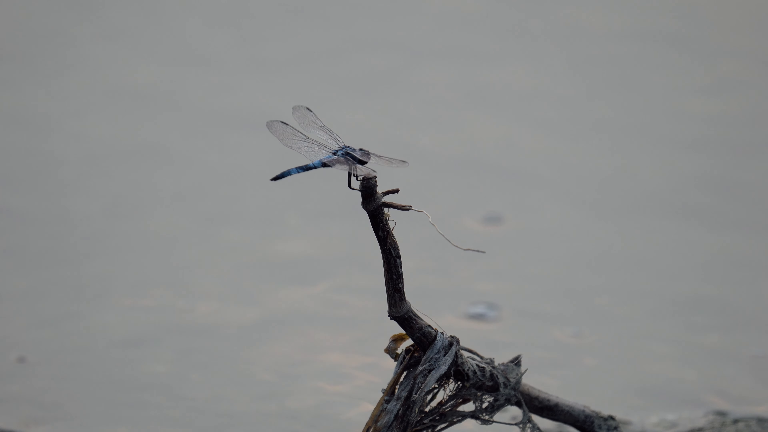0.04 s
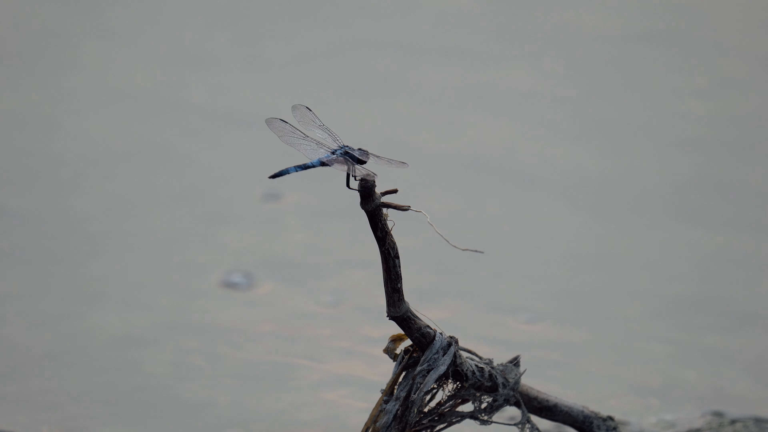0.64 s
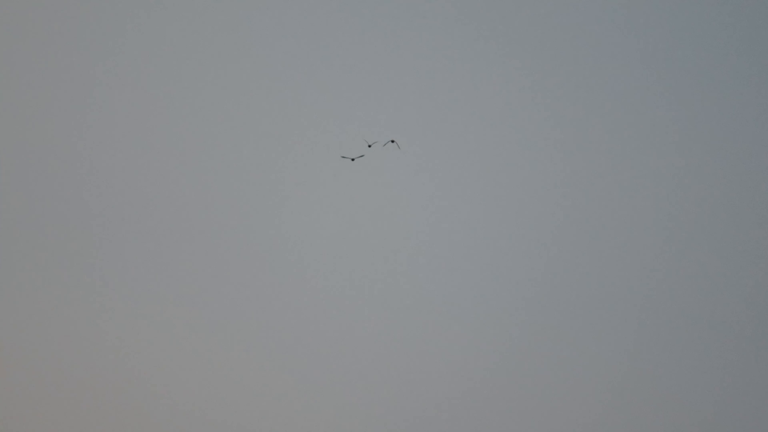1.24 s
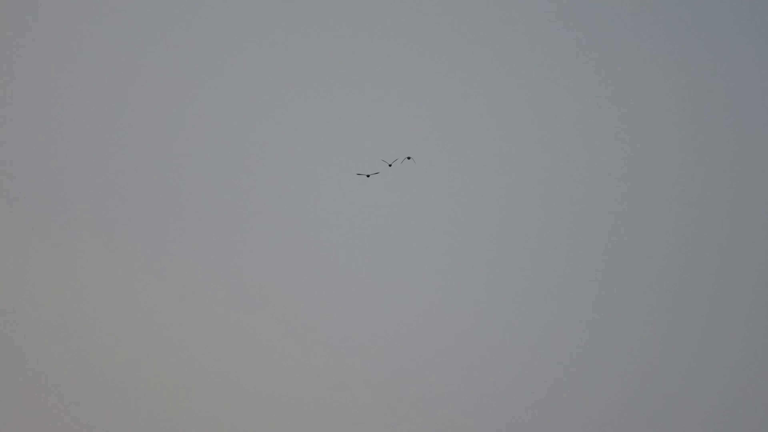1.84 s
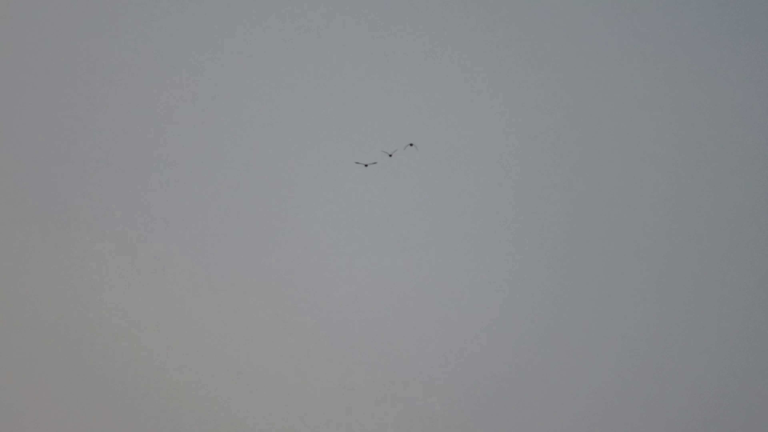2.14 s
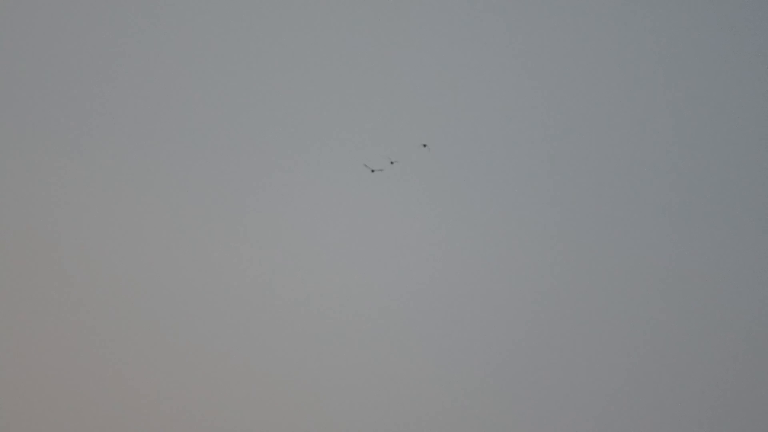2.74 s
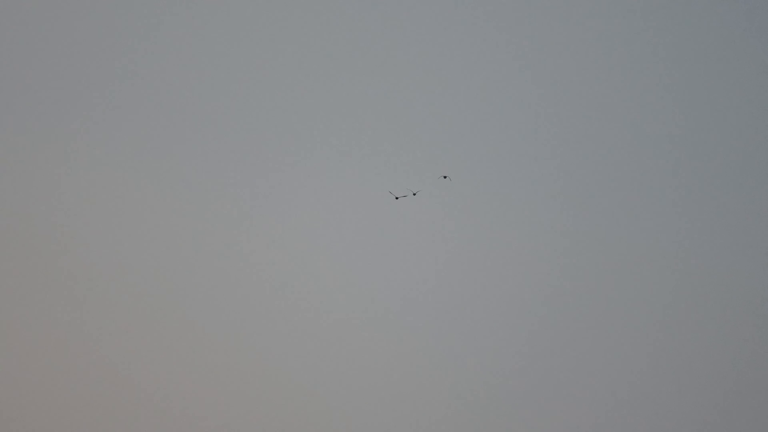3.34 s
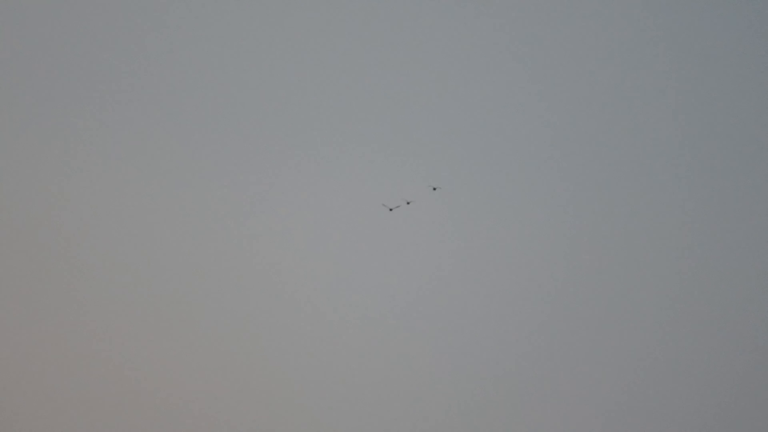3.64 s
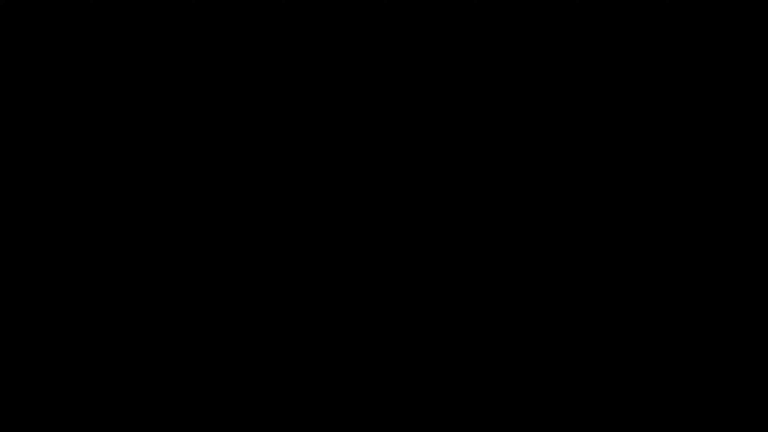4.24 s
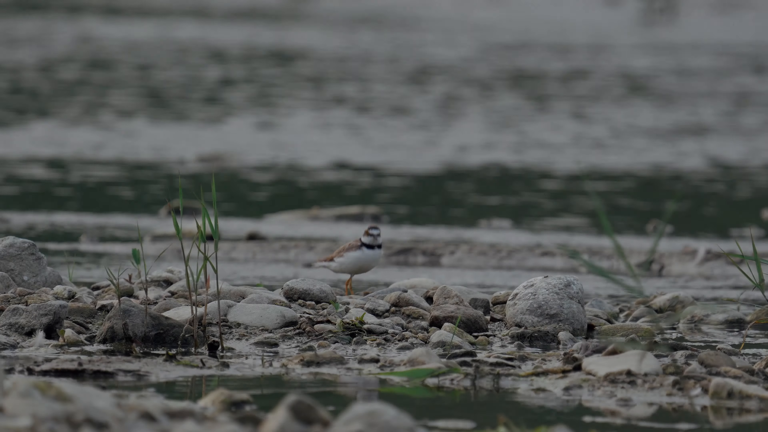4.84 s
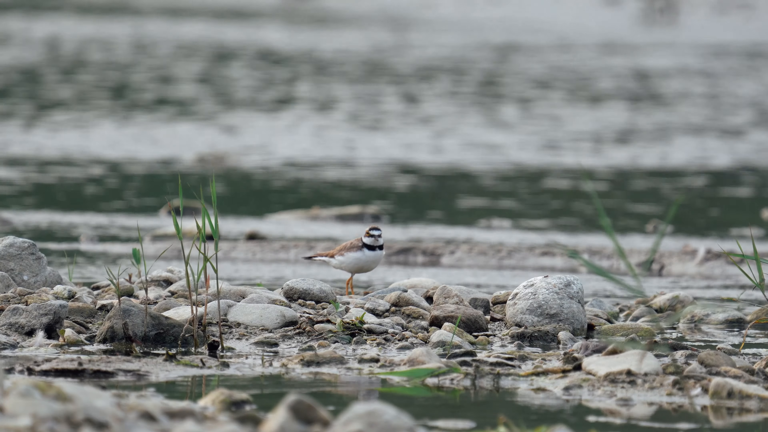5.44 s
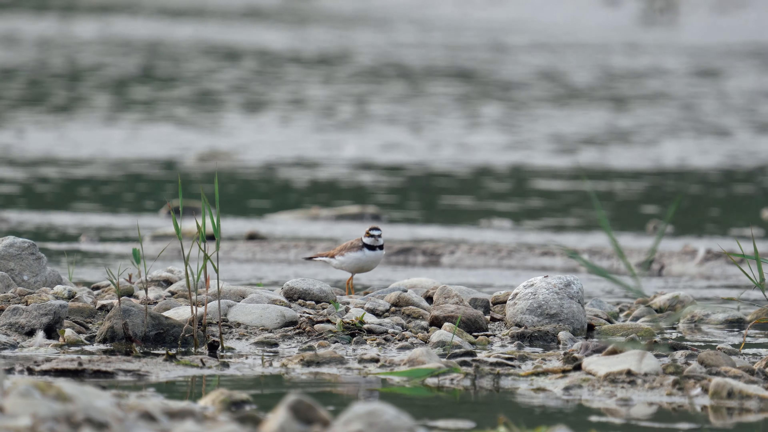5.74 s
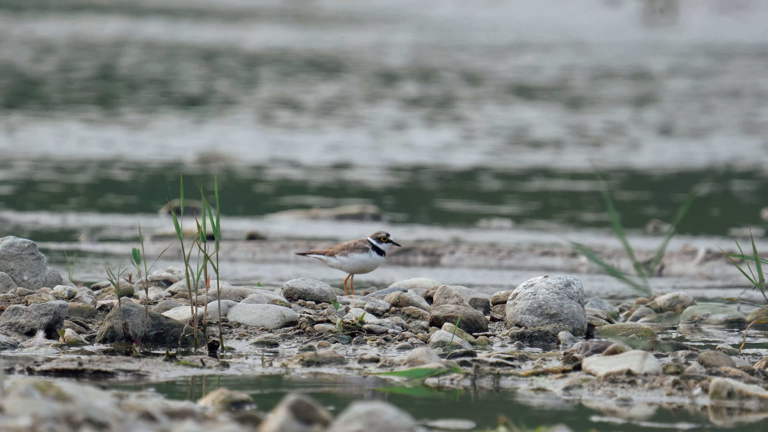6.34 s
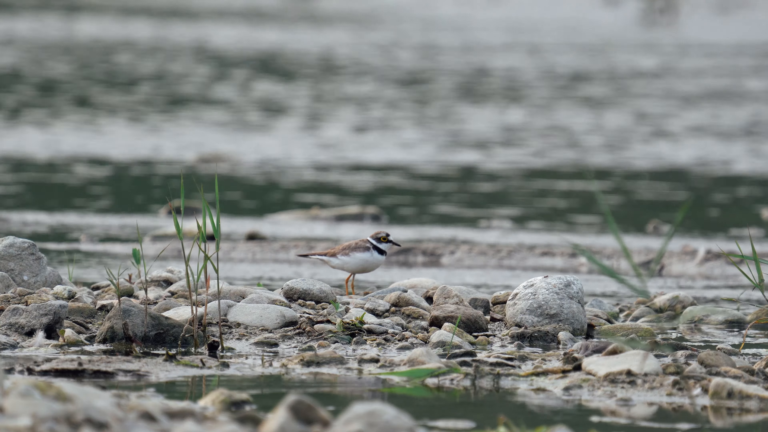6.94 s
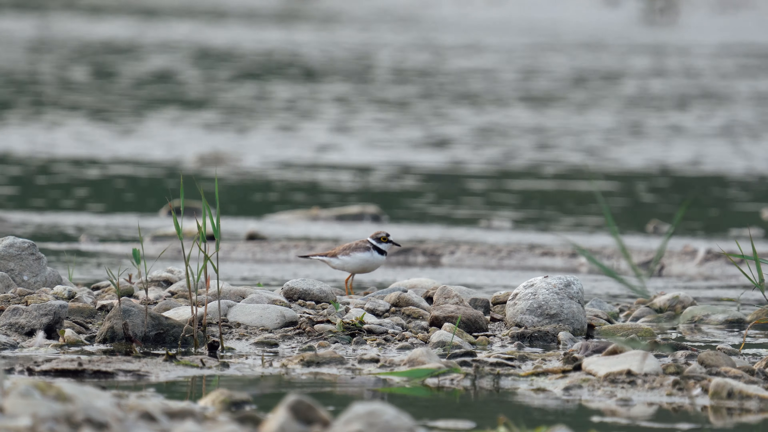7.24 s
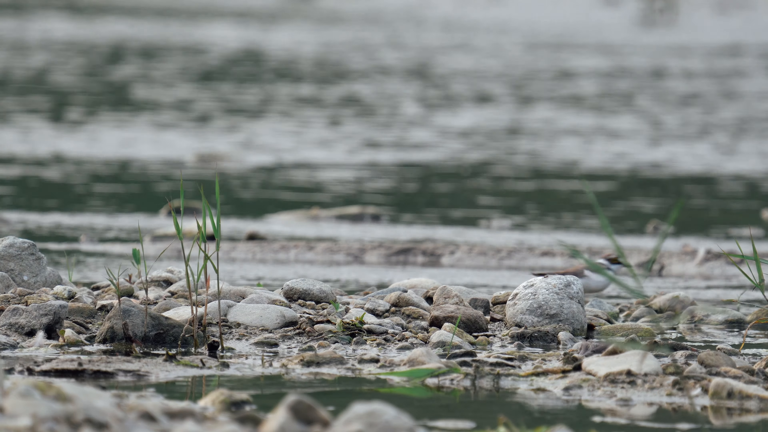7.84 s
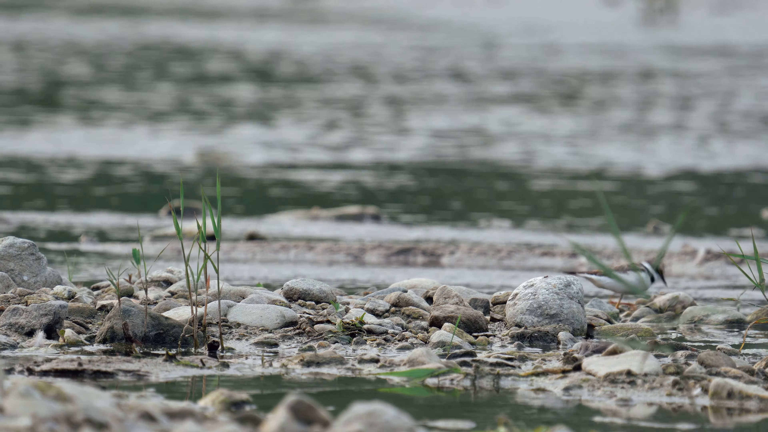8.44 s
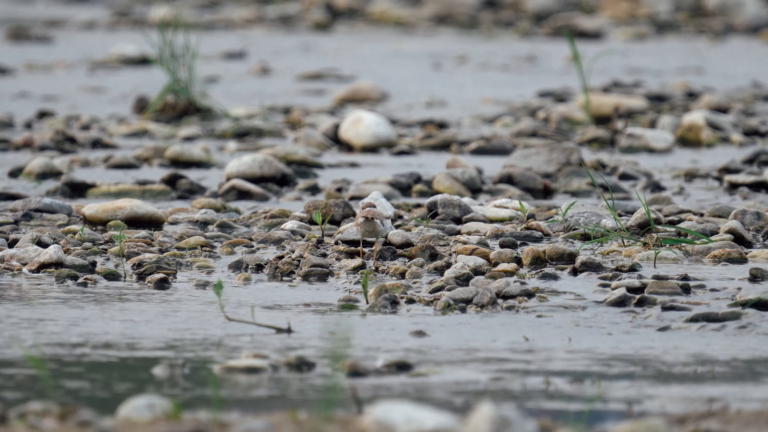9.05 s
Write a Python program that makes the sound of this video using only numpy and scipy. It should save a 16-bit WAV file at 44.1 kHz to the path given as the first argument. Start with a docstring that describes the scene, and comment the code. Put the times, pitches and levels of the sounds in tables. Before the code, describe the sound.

A river rushes steadily, blended with far traffic and heard outdoors from four spots on the bank. Breeze flutters low on the microphone while small distant birds chip and peep. About halfway the sound fades briefly to silence, then the water returns with faint thin whistles and a far motor drone. Near the end a click marks a change to a lower drone. A very faint insect buzz comes and goes.

```python
"""A river's steady rush of turbulence and ringing bubbles, merged with far traffic.
Heard from four spots on the bank, joined by two clicking hard cuts and one short fade to silence.
Breeze eddies buffet the microphone. Far off, small birds chip, peep and whistle and motors drone.
Under these: a thin insect buzz, two dry ticks and a faint electronic whine."""
import sys
import numpy as np
from scipy import signal
from scipy.fft import rfft, irfft, next_fast_len
from scipy.io import wavfile
from scipy.ndimage import uniform_filter1d

SR = 44100
rng = np.random.default_rng(int(sys.argv[2]) if len(sys.argv) > 2 else 0)


def store_pcm(level_fs):
    """Save levels as 16-bit WAV."""
    pcm = np.round(np.clip(level_fs, -1, 1) * 32767).astype(np.int16)
    wavfile.write(sys.argv[1], SR, np.atleast_2d(pcm).T)


N = 406161
T = np.arange(N) / SR

# listening spots: start_s, end_s
SPOTS = [(0, 1.077), (1.077, 4.258), (4.289, 8.5163), (8.5163, 9.3)]
# electronic tones: start_s, end_s, pitch_hz, level_db
WHINE_TONES = [(4.8, 9.2, 10000, -85), (5.0, 8.4, 8000, -87)]
# dry ticks: start_s, decay_s, centre_hz, width_hz, level_db
DRY_TICKS = [(.461, .013, 6000, 11000, -57), (9.063, .002, 7450, 4000, -49)]
# insect buzzes: start_s, length_s, centre_hz, level_db
INSECT_BUZZES = [(1.0, 1.55, 8450, -76), (1.08, 1.0, 8620, -74), (4.3, .45, 8200, -77),
                 (6.3, 1.0, 8250, -77), (8.22, .12, 8150, -75), (8.52, .72, 6900, -73)]
# far engine notes: time_s, pitch_hz, level_db
HIGH_MOTOR = [(5.3, 409, -56), (5.9, 414.5, -47), (6.5, 409.7, -44), (7.3, 411, -40), (7.8, 401.6, -48.5),
              (8.5, 390, -50.5)]
LOW_MOTOR = [(8.52, 166, -44), (8.8, 168, -37), (9.25, 169, -41.5)]
# rasping chips: start_s, top_hz, level_db, note_count
BIRD_CHIPS = [(.005, 4900, -57, 1), (.13, 5300, -61, 1), (.517, 4800, -54, 1), (1.11, 5300, -58, 1),
              (1.61, 4600, -56.5, 1), (1.79, 4300, -57, 1), (2.112, 4700, -55, 1), (2.165, 5020, -51, 2),
              (2.388, 5030, -50.5, 2), (2.77, 4300, -53, 1), (3.16, 5050, -54.5, 2), (3.4, 5050, -53.5, 2),
              (4.07, 4200, -56, 1)]
# arched peeps and thin whistles: start_s, length_s, top_hz, level_db
BIRD_PEEPS = [(2.715, .045, 4480, -56), (2.962, .04, 3720, -51), (2.988, .05, 4480, -50),
              (2.998, .036, 3600, -43)]
BIRD_WHISTLES = [(5.51, .11, 6080, -73), (6.52, .09, 5700, -70), (6.75, .13, 6450, -73),
                 (7.13, .14, 5880, -70), (7.49, .15, 6560, -67), (7.62, .15, 6330, -60),
                 (7.91, .19, 5880, -68), (7.93, .21, 6840, -67), (8.18, .06, 5530, -71),
                 (8.345, .06, 6630, -68), (8.44, .055, 5780, -69)]
# eddy spectrum: freq_hz, density_db
EDDY_SPECTRUM = [(4, -4), (9, 0.5), (18, 6.5), (30, -3), (42, -6.5), (65, -14), (100, -21), (170, -30),
                 (400, -57), (2000, -140)]
# breeze between gusts, per spot: relative_db
LULL_DB = [-39, -22.5, -33.5, -28]
# gusts: peak_s, length_s, rise_db
BREEZE_GUSTS = [(.5, 0.53, 4.5), (1.26, .2, 3.5), (2.42, 0.34, 4.5), (2.84, 0.3, 6), (3.494, 0.33, 5.5),
                (3.95, 0.59, 5.5), (4.885, 0.62, 10), (5.348, 0.31, 8), (6.98, 0.29, 7), (7.62, 0.48, 6.5),
                (8.15, 0.4, 6), (8.756, 0.63, 5.5)]
# rush spectrum before tinting: freq_hz, density_db
RUSH_SPECTRUM = [(100, 0.0), (500, -7.6), (750, -2.7), (1000, -0.1), (1300, -5.4), (1650, -9.5),
                 (2350, -20.0), (3100, -21.5), (3550, -23.8), (4200, -32.3), (5400, -37.8), (7000, -41.7),
                 (11000, -52.9), (15000, -52.6)]
# tint by ground and distance, one table per spot: freq_hz, gain_db
POOL_TINT = [(100, -6.3), (220, -7.2), (420, 1.3), (700, -0.9), (1000, -1.5), (2200, -3.6), (4500, 0.8),
             (7000, -1.7), (15000, -2.0)]
OPEN_SKY_TINT = [(100, -6.0), (190, -1.7), (320, 1.5), (550, 6.7), (800, 5.0), (1400, 2.3), (4500, 3.8),
                 (7000, 0.9), (9000, 4.4), (15000, 3.5)]
GRAVEL_TINT = [(100, -3.7), (210, 2.4), (290, 2.7), (500, -4.5), (750, -1.0), (1600, 0.8), (3300, 0.8),
               (4300, -3.1), (5600, -0.4), (7000, -2), (15000, -1.4)]
SHALLOWS_TINT = [(100, -6.7), (220, 3.0), (350, -1.9), (540, -5.9), (800, -2.3), (1900, -0.4), (3500, -1.5),
                 (4700, -3.4), (6800, -0.0), (15000, -1.2)]
# rush, per spot: level_db
RUSH_LEVEL_DB = [-33, -27.5, -31, -32.5]


def undb(db):
    """Decibels to gain."""
    return 10 ** (np.asarray(db) / 20)


def unit(x):
    """Scale to rms 1."""
    return x / np.sqrt(np.mean(x ** 2) + 1e-20)


def add(out, start_s, x):
    """Mix x into out from start_s."""
    i = max(int(start_s * SR), 0)
    out[i:i + len(x)] += x[:max(len(out) - i, 0)]


def walk(rate_hz):
    """Smooth random control, spread near 1."""
    steps = rng.standard_normal(2048)
    return 1.29 * np.interp(T * rate_hz, np.arange(len(steps)), steps)


def gate(start_s, end_s, ramp_s):
    """On-window with linear ramps."""
    return np.clip(np.minimum(T - start_s, end_s - T) / ramp_s, 0, 1)


def colour(x, spectrum):
    """Filter x by (freq_hz, gain_db) points; rms 1."""
    hz, db = np.transpose(spectrum)
    size = next_fast_len(len(x))
    bins_hz = np.maximum(np.fft.rfftfreq(size, 1 / SR), 1)
    gain = undb(np.interp(np.log(bins_hz), np.log(hz), db))
    return unit(irfft(rfft(x, size) * gain, size)[:len(x)])


def band(count, centre_hz, width_hz):
    """Noise in a bell-shaped band; rms 1."""
    size = next_fast_len(count)
    bins_hz = np.fft.rfftfreq(size, 1 / SR)
    bell = np.exp(-2 * ((bins_hz - centre_hz) / width_hz) ** 2)
    return unit(irfft(rfft(rng.standard_normal(size)) * bell, size)[:count])


def electronics(waver_db=2):
    """Thin electronic tones, unsteady in level."""
    out = np.zeros(N)
    for start_s, end_s, hz, db in WHINE_TONES:
        tone = unit(np.sin(2 * np.pi * hz * T))
        out += undb(db + waver_db * walk(30)) * tone * gate(start_s, end_s, ramp_s=.3)
    return out


def ticks():
    """Faint close ticks: fast-decaying noise."""
    out, t = np.zeros(N), T[:SR // 10]
    for start_s, decay_s, hz, width_hz, db in DRY_TICKS:
        add(out, start_s, undb(db) * band(len(t), hz, width_hz) * np.exp(-t / decay_s))
    return out


def insects(width_hz=520):
    """Bursts of buzzing, each in one narrow resonance."""
    out = np.zeros(N)
    for start_s, length_s, hz, db in INSECT_BUZZES:
        count = int(length_s * SR)
        add(out, start_s, undb(db) * band(count, hz, width_hz) * signal.windows.tukey(count, .25))
    return out


def motor(track, blur_hz, direct_gain=.45):
    """Far engine note: direct sound, blurred by many paths over the ground."""
    time_s, hz, db = np.transpose(track)
    phase = 2 * np.pi * np.cumsum(np.interp(T, time_s, hz)) / SR
    paths = direct_gain + walk(blur_hz) + 1j * walk(blur_hz)
    note = unit(np.real(paths * np.exp(1j * phase)))
    return note * undb(np.interp(T, time_s, db)) * gate(time_s[0], time_s[-1], ramp_s=.018)


def syllable(path_hz, db):
    """Near-pure bird tone along a pitch path, soft at both ends."""
    envelope = np.abs(np.sin(np.linspace(0, np.pi, len(path_hz)))) ** .18
    return undb(db) * unit(envelope * np.sin(2 * np.pi * np.cumsum(path_hz) / SR))


def chips(rasp_hz=190, rasp_depth=.06, droop=.46, crest=.248, spacing_s=.072, accent_db=2):
    """Pitch crests early, then falls, with a fast rasp; the second of a pair is louder."""
    out = np.zeros(N)
    for start_s, top_hz, db, note_count in BIRD_CHIPS:
        length_s = .024 * (5030 / top_hz) ** 4  # lower chips last longer
        t = T[:int(length_s * SR)]
        arch_hz = top_hz * (1 - droop * (t / length_s - crest) ** 2)
        rasp = 1 + rasp_depth * np.sin(2 * np.pi * rasp_hz * t)
        for k in range(note_count):
            add(out, start_s + k * spacing_s, syllable(arch_hz * rasp, db + k * accent_db))
    return out


def peeps(bend_hz_per_s2=980000, waver=.0092):
    """One slightly rough arch of pitch per peep."""
    out, wobble = np.zeros(N), 1 + waver * walk(190)
    for start_s, length_s, top_hz, db in BIRD_PEEPS:
        t = T[:int(length_s * SR)]
        path_hz = top_hz - bend_hz_per_s2 * (t - length_s / 2) ** 2
        add(out, start_s, syllable(path_hz * wobble[int(start_s * SR):][:len(t)], db))
    return out


def whistles(rise_s=.04, glide_hz_per_s=3100, waver=.0057, flutter_db=1.3):
    """Whistles climb briefly and sink; pitch wavers, level flutters."""
    out, wobble = np.zeros(N), 1 + waver * walk(68)
    for start_s, length_s, top_hz, db in BIRD_WHISTLES:
        t = T[:int(length_s * SR)]
        path_hz = top_hz - glide_hz_per_s * np.abs(t - rise_s)
        add(out, start_s, syllable(path_hz * wobble[int(start_s * SR):][:len(t)], db))
    return out * undb(flutter_db * walk(60))


def birds(echo_db=-7, echo_decay_s=.0077):
    """Far calls, scattered by the bank."""
    calls = chips() + peeps() + whistles()
    t = T[:SR // 3]
    scatter = rng.standard_normal(len(t)) * np.exp(-t / echo_decay_s)
    echo = signal.fftconvolve(calls, scatter / np.linalg.norm(scatter))[:N]
    return calls + undb(echo_db) * echo


def breeze(gain_db=2.5, evenness=.98):
    """Eddies push on the microphone: a deep flutter that follows the gusts."""
    eddies = colour(rng.standard_normal(N), EDDY_SPECTRUM)
    power = uniform_filter1d(uniform_filter1d(eddies ** 2, SR // 6), SR // 20)
    flutter = unit(eddies / np.sqrt(power + 1e-9) ** evenness)  # chance swells levelled out
    steps_db = np.select([T < end_s for _, end_s in SPOTS], np.array(LULL_DB, float))
    lull_db = uniform_filter1d(steps_db, SR // 100)
    gust_db = sum(rise_db * .5 ** ((2 * (T - peak_s) / length_s) ** 2)
                  for peak_s, length_s, rise_db in BREEZE_GUSTS)
    return flutter * undb(lull_db + gust_db + gain_db)


def turbulence(flicker_db=.67, flicker_hz=14, surge_db=.14, surge_hz=5.9):
    """Broad noise: each half octave flickers alone; all surge slightly together."""
    size = next_fast_len(N)
    white = rfft(rng.standard_normal(size))
    bins_hz = np.fft.rfftfreq(size, 1 / SR)
    half_octaves = 2 * np.log2(np.clip(bins_hz / 125, 1, 128))
    out = np.zeros(N)
    for k in range(15):
        share = np.cos(np.pi / 2 * np.clip(half_octaves - k, -1, 1)) ** 2
        out += irfft(white * share, size)[:N] * undb(flicker_db * walk(flicker_hz))
    return unit(out) * undb(surge_db * walk(surge_hz))


def bubbles(count=9000, spread_db=3, decay_cycles=7, glide=.147):
    """Tiny bubbles in the riffles: each rings briefly and rises in pitch."""
    out = np.zeros(N)
    for time_draw, pitch_draw, level_draw in rng.random((count, 3)):
        hz = 350 * 42 ** pitch_draw
        decay_s = decay_cycles / hz
        age = T[:int(4 * decay_s * SR)] / decay_s
        ring = np.sin(2 * np.pi * decay_cycles * age * (1 + glide * age / 4)) * np.exp(-age)
        gain = hz * undb(-spread_db * np.log(max(level_draw, .01)))
        add(out, time_draw * N / SR, gain * ring)
    return unit(out)


def river(bubble_db=-12, swell_db=.42, swell_hz=.76):
    """Rush of turbulence and bubbles, tinted by ground and distance at each spot."""
    flow = colour(turbulence() + undb(bubble_db) * bubbles(), RUSH_SPECTRUM)
    tints = POOL_TINT, OPEN_SKY_TINT, GRAVEL_TINT, SHALLOWS_TINT
    out = np.zeros(N)
    for (start_s, end_s), tint, db in zip(SPOTS, tints, RUSH_LEVEL_DB):
        stretch = flow[int(start_s * SR):int(end_s * SR)]
        add(out, start_s, undb(db) * colour(stretch, tint))
    return out / undb(swell_db * walk(swell_hz))


def scene():
    """Mono sum of all sources."""
    motors = motor(HIGH_MOTOR, blur_hz=36) + motor(LOW_MOTOR, blur_hz=14)
    return (river() + breeze() + motors + birds() + insects() + ticks() + electronics())[None]


def record(dry):
    """Second spot fades to brief silence; hard cuts click; low-pass on the mix."""
    fade_start_s, fade_end_s, resume_ramp_s = 4.102, 4.27, .0001
    click_decay_s, cutoff_hz = .00067, 15800
    fade = np.clip((fade_end_s - T) / (fade_end_s - fade_start_s), 0, 1) * (T < SPOTS[1][1])
    resume = np.clip((T - SPOTS[2][0]) / resume_ramp_s, 0, 1)
    joined = dry * (fade + resume)
    click = np.exp(-T[:SR // 20] / click_decay_s)
    add(joined[0], start_s=1.076, x=.016 * click)
    add(joined[0], start_s=8.5163, x=.2 * click)
    lowpass = signal.ellip(10, .1, 80, cutoff_hz, fs=SR, output="sos")
    return signal.sosfilt(lowpass, joined)


dry = scene()
out = record(dry)
store_pcm(out)
```